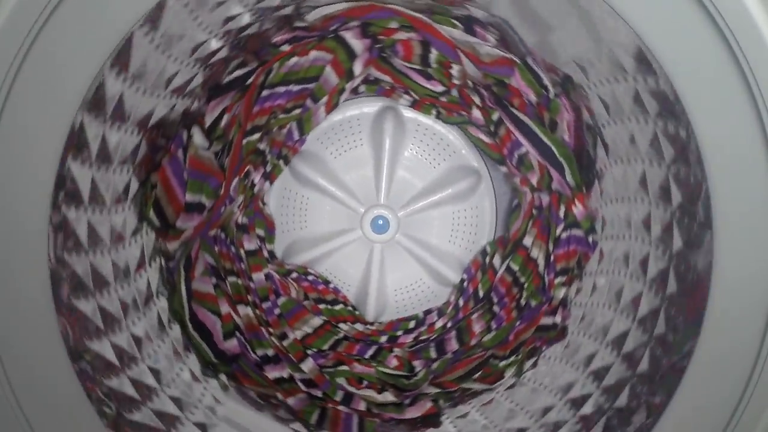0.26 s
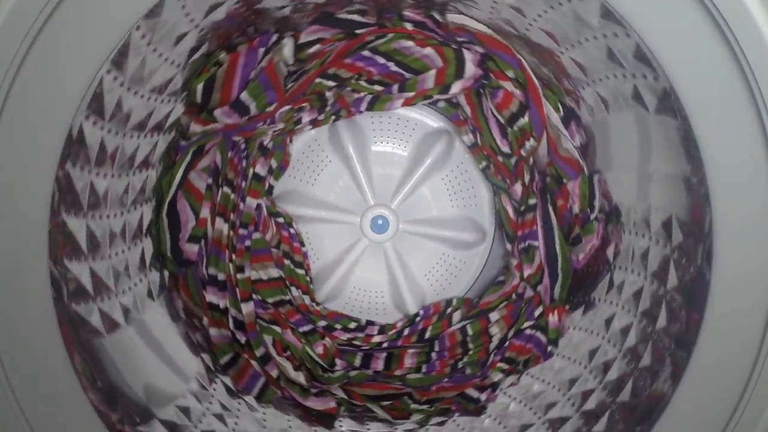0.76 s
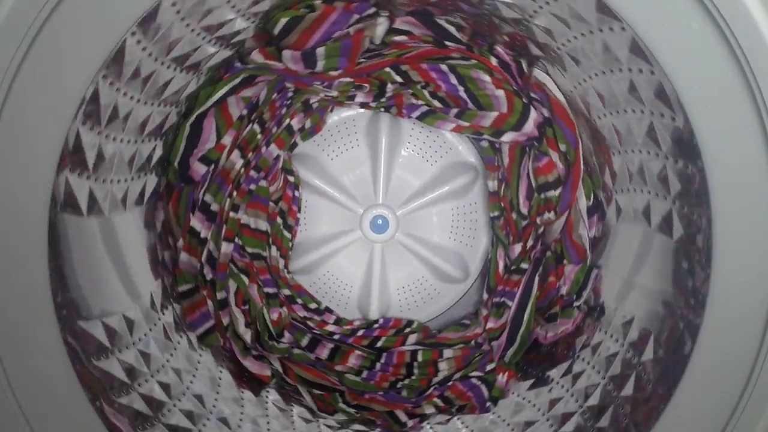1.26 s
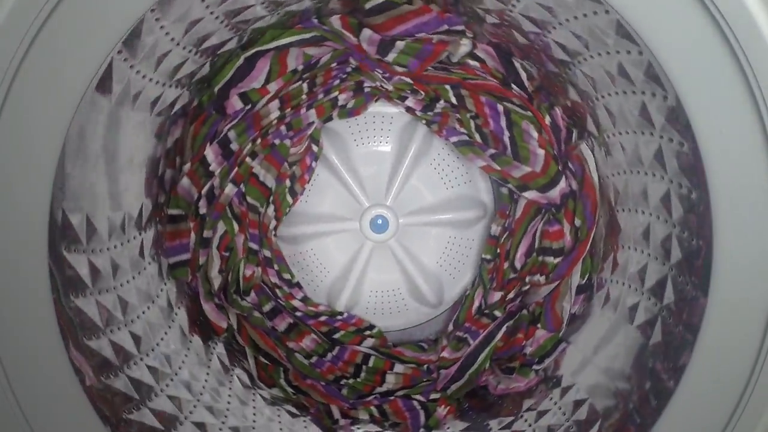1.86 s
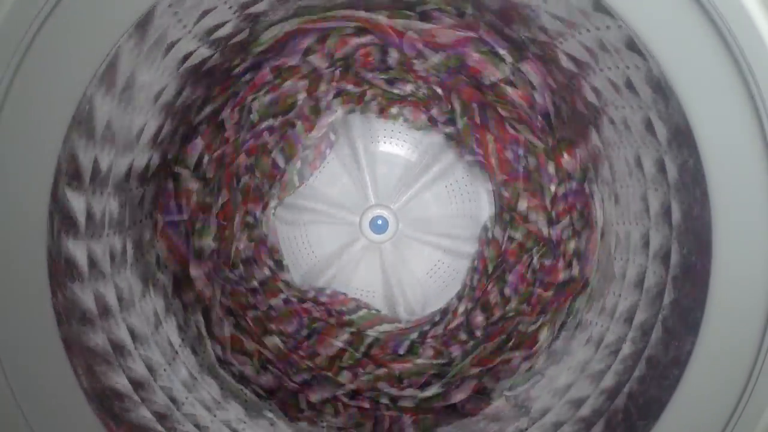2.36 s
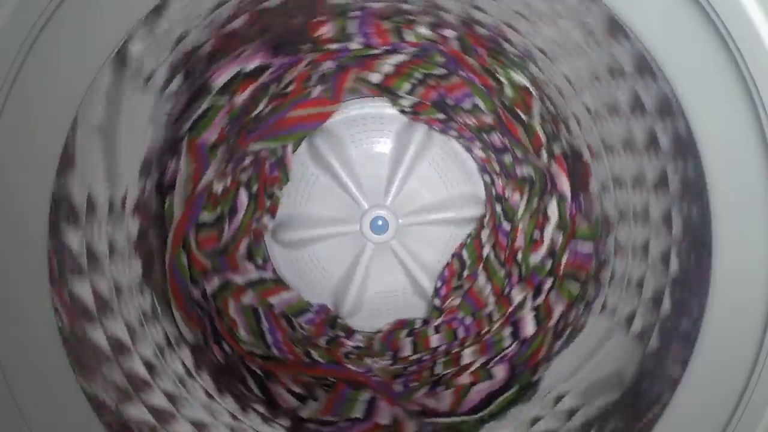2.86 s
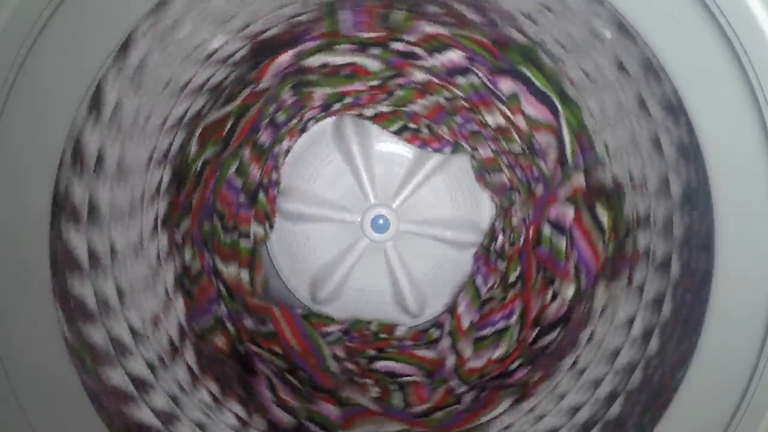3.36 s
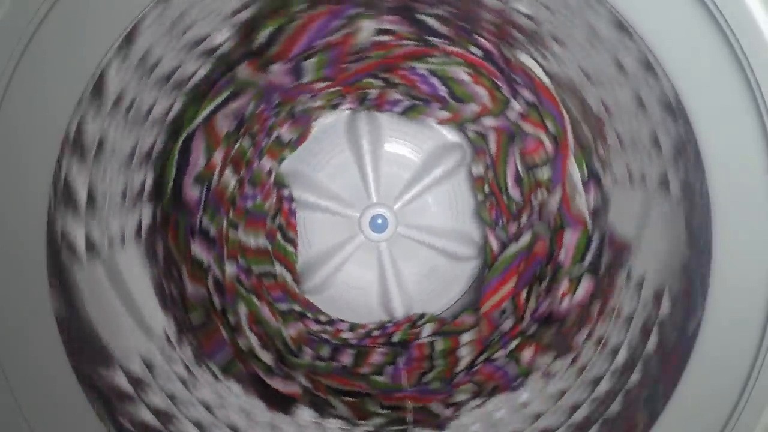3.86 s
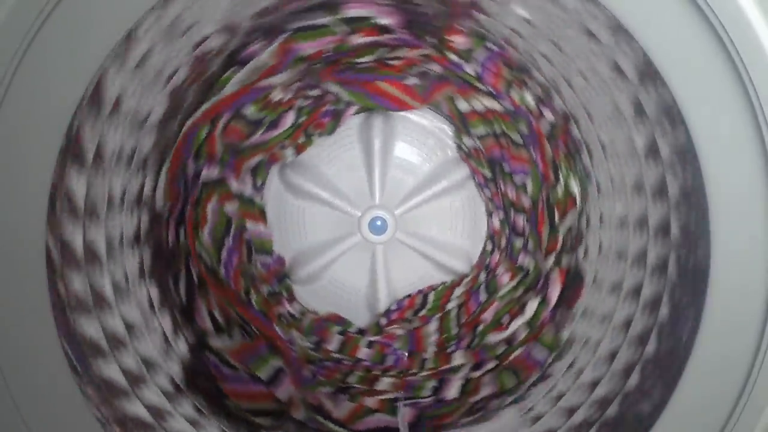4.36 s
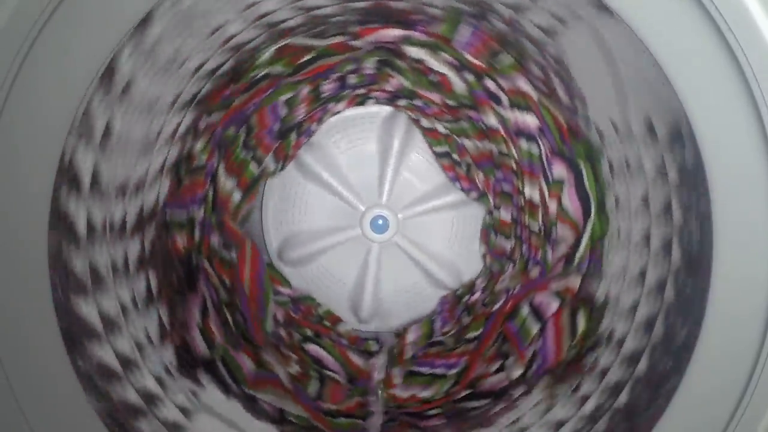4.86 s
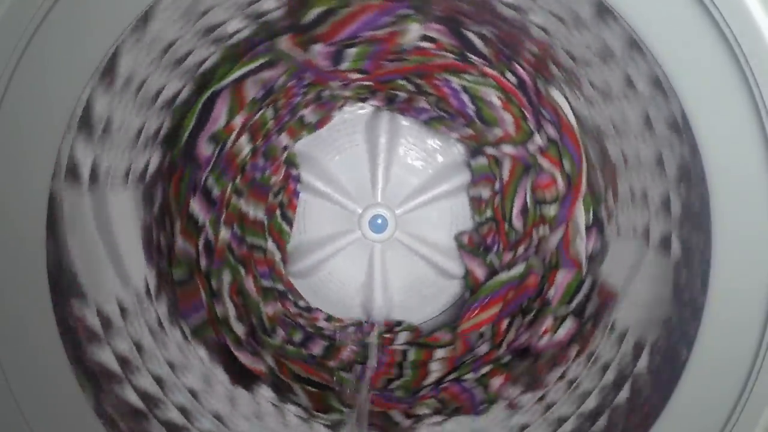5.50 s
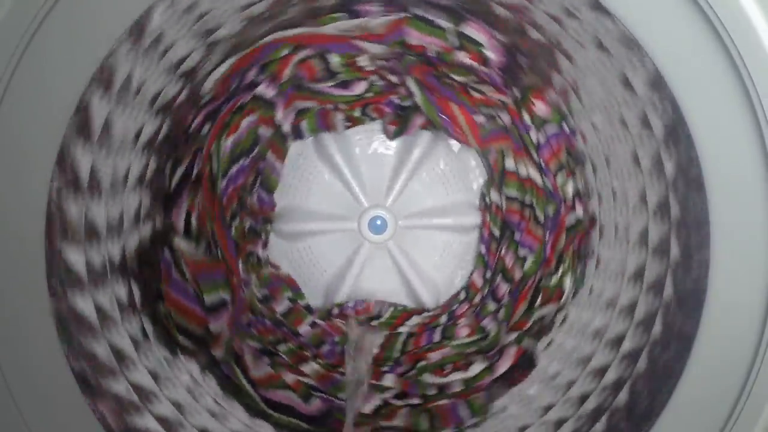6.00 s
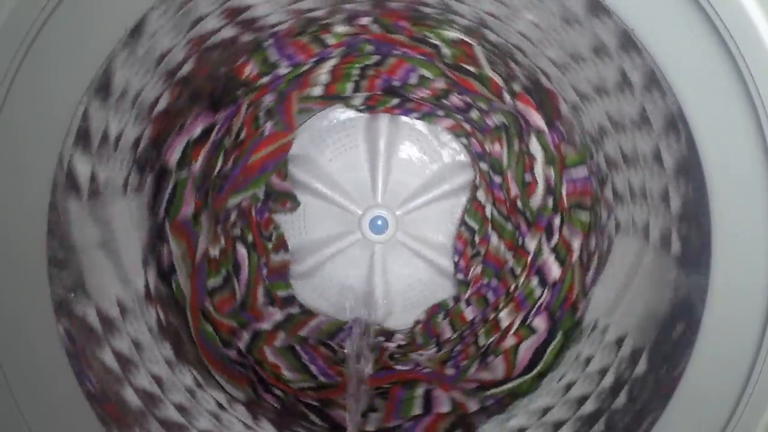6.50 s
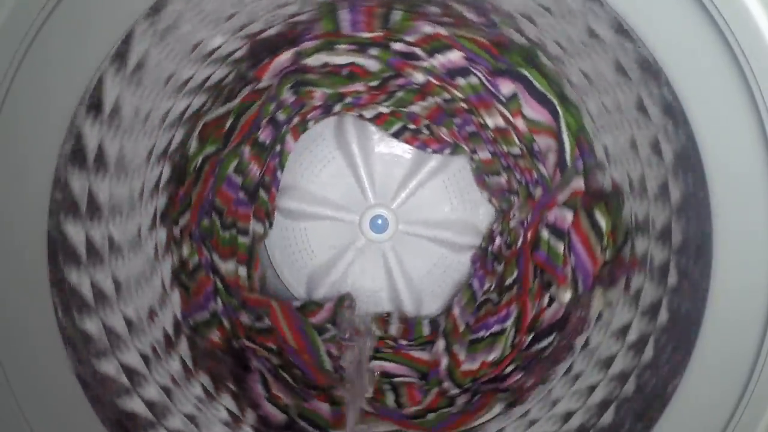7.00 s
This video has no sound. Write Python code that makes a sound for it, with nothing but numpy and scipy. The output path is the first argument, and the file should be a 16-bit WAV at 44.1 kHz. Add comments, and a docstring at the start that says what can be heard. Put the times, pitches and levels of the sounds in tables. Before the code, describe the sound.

Heard close above an open top-loading washer, the motor buzzes and grinds under load, with brief singing chirps early on. After about two and a half seconds the drive releases and the drum coasts with a low rumble, soft knocks and rubbing over a constant electrical hum. A few drips tick, then water spits and opens into a spattering jet on the laundry, pulsing as the drum turns.

```python
"""A top-loading washer, heard from just above its open tub: the motor pulls the drum up to speed, buzzing
and grinding, until the drive lets go and the drum coasts, rumbling and knocking, over a hum at twice the mains.
Tones make the hum, the buzz, the rotor's shake and the singing chirps; shaped noise makes most of the rest.
Water drips in and grows to a jet: bursts of noise spatter on the laundry, swell with each turn and ring the tub."""
import sys
import numpy as np
from scipy import signal
from scipy.fft import rfft, irfft, next_fast_len
from scipy.io import wavfile
from scipy.ndimage import map_coordinates

SR = 44100
rng = np.random.default_rng(int(sys.argv[2]) if len(sys.argv) > 2 else 0)


def digitize_waveform(pressure):
    """Quantize a signal to 16-bit integers and store it at the path in sys.argv[1].

    Rows of a 2-D input are taken as channels; values are limited to [-1, 1].
    """
    field = np.atleast_2d(pressure).T
    bounded = np.clip(field, -1, 1)
    quanta = np.round(bounded * 32767).astype(np.int16)
    wavfile.write(sys.argv[1], SR, quanta)


N = 319284

MAINS_HZ = 60
SPIT_S, OPEN_S = 5.16, 5.385  # the inlet first spits weakly, then opens fully
# the gears' whine climbs unevenly as the drum starts, then fades into their rasp: t/s, f/Hz, level/dB
GEAR_WHINE = [(0.0, 1270, -45), (0.1, 1267, -71), (0.35, 1215, -57), (0.58, 1252, -46), (0.82, 1281, -48),
              (1.13, 1305, -46.5), (1.25, 1295, -43.5), (1.55, 1303, -47), (1.82, 1290, -45.5),
              (2.25, 1320, -50), (2.5, 1314, -54)]
# standing waves of the tub: f/Hz, width/Hz, lift/dB
TUB_MODES = [(892, 26, 8), (1194, 80, 11), (1350, 76, -14.5), (1394, 69, -2.5), (1925, 81, 6),
             (2230, 160, 4.5), (2770, 70, 4.5), (3000, 140, -9), (3280, 180, 3), (3470, 87, -5),
             (4270, 290, -10), (4573, 51, 8), (6330, 370, 1.5), (7660, 260, -2), (8770, 490, -7.5),
             (10030, 590, -7.5)]


def amp(db):
    """Decibels to gain."""
    return 10 ** (np.asarray(db) / 20)


def unit(x):
    """Scale to rms 1."""
    return x / np.sqrt(np.mean(x ** 2) + 1e-20)


def since(s):
    """Seconds after the moment s for every sample, negative before it."""
    return np.arange(N) / SR - s


def curves(rows):
    """One value per sample for each column after the time."""
    s, *cols = np.transpose(rows)
    return [np.interp(np.arange(N) / SR, s, c) for c in cols]


def wobble(rate):
    """A smooth random curve, rate knots a second."""
    knots = rng.standard_normal(int(N * rate / SR) + 4)
    fine = np.arange(0, len(knots), 1 / 8)
    return np.interp(np.arange(N) * rate / SR, fine, map_coordinates(knots, [fine]))


def filtered(x, response):
    """x times a response of frequency."""
    m = next_fast_len(len(x) + 8192)  # room for the filter to ring out
    return irfft(rfft(x, m) * response(np.fft.rfftfreq(m, 1 / SR)), m)[:len(x)]


def coloured(x, points):
    """x through a spectrum of (f/Hz, level/dB) points, joined on a log frequency scale."""
    f, db = np.transpose(points)
    return filtered(x, lambda hz: amp(np.interp(np.log(hz + 1), np.log(f), db)))


def bandpass(f, centre, width):
    """Complex response of one resonance, 1 at its centre."""
    return 1j * f * width / (centre * centre - f * f + 1j * f * width)


def resonate(x, modes):
    """x through steep resonances (f/Hz, width/Hz, level/dB), each applied twice."""
    return filtered(x, lambda f: sum(amp(db) * bandpass(f, c, w) ** 2 for c, w, db in modes))


def with_rings(x, modes):
    """Standing waves lift or sink narrow bands (f/Hz, width/Hz, lift/dB); lifted ones ring on."""
    def response(f):
        gain = 1
        for c, w, db in modes:
            gain = gain * (1 + (amp(db) - 1) * bandpass(f, c, w))
        return gain
    return filtered(x, response)


def whine(hz, width):
    """A fuzzy tone of rms 1, about width Hz wide, that can glide."""
    angle = 2 * np.pi * np.cumsum(hz * np.ones(N)) / SR
    return unit(wobble(width) * np.cos(angle) + wobble(width) * np.sin(angle))


def mains_lines(lines, waver_db, drift):
    """Multiples of the mains frequency with spread phases, each wavering in level and phase (drift/rad)."""
    angle = 2 * np.pi * MAINS_HZ * np.arange(N) / SR
    total = 0
    for k, db in lines:
        level = amp(db + waver_db * wobble(14))
        total = total + level * np.sin(round(k) * angle + round(k) ** 2 + drift * wobble(9.0))
    return np.sqrt(2) * total


def taps(rows, t60, width_share):
    """Short bursts of noise, each gathered round its own pitch and dying by 60 dB in t60 seconds."""
    out, t = np.zeros(N + SR), np.arange(SR // 8) / SR
    for s, db, hz in rows:
        ring = unit(resonate(rng.standard_normal(len(t)), [(hz, hz * width_share, 0)]))
        attack = 1 - np.exp(-t / .001)
        out[round(s * SR):][:len(t)] += amp(db - 60 * t / t60) * attack * ring
    return out[:N]


def hum():
    """The windings hum at even multiples of the mains; the rotor shakes the tub once a turn."""
    # level of the hum before a small fixed lift: t/s, level/dB
    hum_levels = [(0.0, -29), (0.68, -25), (0.83, -28.5), (1.05, -26.0), (1.75, -28), (1.95, -26),
                  (2.11, -31), (2.3, -27), (2.6, -26.5), (3.1, -28.5), (3.57, -28.5), (3.75, -27.5),
                  (4.5, -26.5), (5.7, -28.5), (6.3, -28.5), (6.45, -26), (6.55, -28.5), (7.2, -28)]
    # the hum and its overtones: multiple of the mains, relative level/dB
    hum_lines = [(2, -1), (4, -31.5), (6, -24.5)]
    hum_db, = curves(hum_levels)
    windings = amp(hum_db + 1.0) * mains_lines(hum_lines, waver_db=0.53, drift=0.038)
    shaft_hz = 29.6 + 3 * wobble(8.3)
    shake = np.sqrt(2) * np.sin(2 * np.pi * np.cumsum(shaft_hz) / SR)
    return windings + amp(-46 + 2 * wobble(4.4)) * shake


def plops():
    """Once the jet runs fully, it traps bubbles in the folds of the laundry that plop at scattered pitches."""
    rate = 28  # bubbles a second
    times = np.arange(OPEN_S + 1 / rate, N / SR, 1 / rate)
    late, size, pitch = np.clip(rng.standard_normal((len(times), 3)).T, -2, 2)
    rows = zip(times + 0.36 * late / rate, -46.5 + 2.9 * size, 1880 * np.exp(0.286 * pitch))
    return taps(rows, t60=0.043, width_share=0.085)


def splats(rows, life_s, pocket_db):
    """Water slaps cloth: each burst has a dull body, fine mist and pitched air pocket, and echoes in the tub."""
    reference_hz, length_power = 6040, .45  # lower splats ring longer than those at this pitch
    pocket_octaves, colour_db, colour_hz = 0.12, 2.5, 649  # pocket width; depth and spacing of own peaks and dips
    out, t = np.zeros(N + SR), np.arange(SR // 12) / SR
    attack = (1 - np.exp(-t / 0.0011)) ** 2
    for s, db, hz, body_db, mist_db in rows:
        tail_spread = np.exp(0.18 * rng.standard_normal())
        t60 = life_s * (reference_hz / hz) ** length_power * tail_spread
        fragments, peaks = rng.standard_normal((2, 56))
        # each splat breaks into fragments
        grain_db = 2 * np.interp(t, np.linspace(0, t[-1], len(fragments)), fragments)
        shape = amp(-60 * t / t60 + grain_db) * attack
        spectrum = [(400, body_db - 8), (1200, body_db - 10), (2200, body_db - 0.5), (3900, -0.75),
                    (6500, -0.052), (9000, mist_db + 7.0), (11500, mist_db - 0.5), (15000, mist_db - 13)]
        slap = coloured(rng.standard_normal(len(t)), spectrum)

        def pocket_and_colour(f):
            octaves_off = np.log2((f + 1) / hz)
            pocket = pocket_db * np.exp(-.5 * (octaves_off / pocket_octaves) ** 2)
            colour = colour_db * np.interp(f / colour_hz, np.arange(len(peaks)), peaks)
            return amp(pocket + colour)

        burst = shape * filtered(slap, pocket_and_colour)
        # the level is set by the first 7 ms
        out[round(s * SR):][:len(t)] += amp(db - 1) * burst / np.std(burst[t < .007])
    echo = rng.standard_normal(len(t)) * amp(-60 * t / 0.067) * (1 - np.exp(-t / 0.0028))
    echoed = signal.fftconvolve(out, echo / np.linalg.norm(echo))[:N]
    return with_rings(out[:N] + amp(-9.5) * echoed, TUB_MODES)


def slaps():
    """Drips, then slugs of water slap the cloth and burst over trapped pockets of air."""
    # single drips and slugs: t/s, relative level/dB, pitch f/Hz, body level/dB, mist level/dB
    slugs = [(4.4318, -52.5, 9330, 10.5, -8), (4.6294, -55.5, 7050, 4, -12), (5.0427, -50.5, 6170, -5, -19),
             (5.0853, -49.5, 6360, -13, -15), (5.1622, -49, 6680, 0, -10), (5.177, -50.5, 5610, 0, -16),
             (5.1884, -49.5, 2270, 5, -6), (5.2155, -51.5, 10900, 7, -1), (5.2455, -59.5, 6800, 0, -8),
             (5.3712, -57.5, 2110, 8, -4), (5.384, -59, 4580, 4, -9), (5.3905, -49.5, 8150, -3, -10.5),
             (5.3978, -43, 4600, 2, -9.5), (5.4112, -48, 6990, -9, -12), (5.4465, -42.5, 6540, 4, -18),
             (5.4505, -51, 7120, -2, -16), (5.4755, -39, 6400, -3, -17), (5.5092, -38, 4400, 6, -24.5),
             (5.514, -43, 2390, 6.5, -14.5), (5.525, -42.5, 6540, -8, -13.5), (5.5355, -47, 4590, 3, -8),
             (5.5603, -46, 3340, -2, -13.5), (5.5713, -42, 4640, 3, -20.5), (5.5892, -32.5, 2510, 7, -24.5),
             (5.7175, -52, 3500, -5, -9.5), (5.7246, -41.5, 3380, -6, -21), (5.7653, -46, 5490, -1, -15),
             (5.7725, -32, 5450, -13, -16), (5.7833, -43, 6400, -8, -9), (5.7945, -45.5, 10000, -11, -2),
             (5.8137, -51, 5600, -4, -9.5), (5.8297, -43, 5340, -2, -11), (5.841, -46, 4600, -5, -17),
             (5.8525, -39.5, 4640, -2.5, -14.5), (5.9135, -46, 6350, 5, -18.5),
             (5.9704, -46, 6380, -12, -17), (6.0048, -43.5, 6410, -18, -6), (6.0213, -46, 2110, 5, -9),
             (6.0277, -43.5, 2250, -5.5, -11.5), (6.0472, -50, 6660, -5.5, -16),
             (6.0745, -41.5, 7080, 1, -17), (6.085, -37.5, 4590, 8.5, -12.5),
             (6.0995, -40, 4620, -11, -3.5), (6.1115, -46, 6200, 0, -11.5), (6.133, -36.5, 6170, -1, -20),
             (6.143, -44, 7000, -5, -13.5), (6.1585, -37, 5400, -4, -15), (6.1799, -43.5, 4770, 7, -18.5),
             (6.203, -51, 1850, 5, -22), (6.2138, -43.5, 7060, 0, -9.5), (6.2434, -44.5, 2260, -5, -18.5),
             (6.284, -51.5, 1650, 17, -19), (6.3038, -44, 6260, 1, -5), (6.344, -44.5, 6420, -1, -7),
             (6.3515, -39, 7200, 5, -10), (6.3774, -39, 6340, -6, -8), (6.3955, -44, 2110, 6, -7),
             (6.407, -42, 5600, -2, -14), (6.417, -40, 6300, -4.5, -17.5), (6.4438, -40.5, 6450, 7, -14),
             (6.4612, -36, 5700, -4, -18), (6.472, -38.5, 6100, -8, -22), (6.4955, -45, 3280, 0, -14.5),
             (6.539, -38.5, 3840, 7, -15.5), (6.557, -32, 6300, 5, -16), (6.6089, -47.5, 5730, -4, -14),
             (6.6295, -41.5, 6500, -23, -22), (6.6445, -47.5, 6310, -12, -8.5), (6.66, -49, 6590, -7, -7.5),
             (6.686, -40.5, 6400, -5, -7), (6.7281, -43.5, 6170, -12, -13), (6.736, -48, 4400, -4.5, -4),
             (6.7535, -43.5, 3930, 0, -14), (6.7715, -48.5, 7500, -6, -8), (6.785, -44.5, 6520, -9, -6.5),
             (6.8068, -39, 6400, -14, -15), (6.8349, -42, 6130, -7, -17), (6.8499, -36.5, 5800, -4.5, -8),
             (6.8625, -43.5, 7200, -2, -9.5), (6.8728, -41, 5980, -7, -10.5), (7.0125, -46.5, 5780, 6, -14),
             (7.0344, -58, 6410, 1, -2), (7.0487, -36.5, 7250, 2.5, -20.5), (7.1405, -40, 6400, -16, -2),
             (7.1596, -42, 6330, -10, -8), (7.1826, -41, 5530, 0, -8.5), (7.2035, -42, 6360, 0, -14.5),
             (7.2195, -40, 4900, -7, -15)]
    return splats(slugs, life_s=0.02, pocket_db=9)


def jet():
    """The jet breaks into drops over a faint fizz, swelling once per drum turn; its weight drums on the tub wall."""
    # spectrum of the fizz: f/Hz, relative level/dB
    spray_colour = [(300, -7), (600, 15.5), (1000, -1), (2000, 8), (3000, -9), (4200, -3), (5500, -1),
                    (7000, -0.5), (8500, -11), (11500, -6), (15000, -23)]
    turn_hz, crest_s = 2.92, 6.2  # drum turns a second; a moment when the laundry meets the jet most fully
    drop_rate = 125  # small drops a second between the slugs

    def opened(s):
        return np.clip(since(s) / 0.039 + .5, 0, 1)

    turn = amp(1.5 * np.cos(2 * np.pi * turn_hz * since(crest_s)))
    flow = np.maximum(amp(-7) * opened(SPIT_S), opened(OPEN_S))

    times = np.arange(SPIT_S, N / SR, 1 / drop_rate)
    late, size, pitch, body, mist = rng.standard_normal((len(times), 5)).T
    drop_s = times + .4 * late / drop_rate
    drop_db = -52.5 + 3 * np.minimum(size, 1.5)
    drop_rows = zip(drop_s, drop_db, 6200 * np.exp(.4 * pitch), -2 + 5 * body, -10 + 4 * mist)
    drops = splats(drop_rows, life_s=0.02, pocket_db=11)

    fizz = rng.standard_normal(N) * amp(5.5 * wobble(260))
    # the fizz grows by 2.5 dB a second while the stream breaks up unevenly
    spray_db = -59.5 + 2.5 * since(OPEN_S) + 0.5 * wobble(25)
    spray = amp(spray_db) * unit(with_rings(coloured(fizz, spray_colour), TUB_MODES))

    wall_modes = [(435, 164, -3.0), (852, 41, -1.5), (1088, 89, -4.0), (1197, 100, 1.0)]
    wall = unit(resonate(rng.standard_normal(N) * amp(1.9 * wobble(22)), wall_modes))
    wall_db = -52.5 - 2 * since(OPEN_S)  # less as the laundry soaks
    return turn * (flow * (drops + spray) + opened(OPEN_S) * amp(wall_db) * wall)


def knocks():
    """The load knocks and brushes softly against the drum in short pitched bursts."""
    # single knocks: t/s, relative level/dB, pitch f/Hz
    knock_rows = [(2.5986, -41, 1545), (2.6785, -36.5, 1290), (2.7, -51, 4750), (2.7953, -52, 1260),
                  (2.8848, -39, 1530), (2.9284, -41, 1290), (3.0734, -39, 1300), (3.088, -44, 2300),
                  (3.1704, -46, 1660), (3.2921, -48, 1280), (3.5964, -48, 3220), (3.8189, -45.5, 1390),
                  (3.8547, -42, 1260), (3.9661, -45, 2250), (4.0599, -45, 1230), (4.4215, -36.5, 1950),
                  (4.5827, -43, 1620), (4.8239, -48, 2200), (4.8646, -52, 2140), (5.213, -36.5, 1220),
                  (5.369, -39, 1200)]
    return amp(-3.5) * taps(knock_rows, t60=0.078, width_share=0.2)


def drum():
    """The loaded drum rumbles and booms, and rubs with an uneven grain that rings the gear case in patches."""
    # the load shifts and the tub booms: t/s, level/dB
    boom_rows = [(2.66, -39), (2.81, -42), (3.0, -42), (3.46, -43), (3.89, -38), (5.27, -36.5),
                 (5.46, -34.5), (5.65, -35.5), (5.82, -30.5)]
    # spectra of the rumble and of the rubbing: f/Hz, relative level/dB
    rumble_colour = [(15, -8.5), (29, -2.5), (42, -5), (60, -11), (88, 3.5), (115, -2), (145, 6), (180, -5),
                     (240, -10.5), (320, -19), (450, -24.5), (900, -56.5), (3000, -100)]
    rub_colour = [(150, -8.5), (400, 2), (550, -0.5), (750, 0), (930, -6.5), (1250, -5), (1600, -9.5),
                  (1780, -12), (2350, -12), (3000, -15), (4700, -19.5), (7000, -24.5), (10000, -31.5),
                  (15000, -39.5)]
    # resonances of the drum's shell: f/Hz, width/Hz, lift/dB
    shell_modes = [(1212, 85, 5.5), (1530, 240, 4), (1920, 160, 6.5), (2200, 320, 1.5), (2770, 140, 3.5),
                   (3220, 130, 5.5), (3700, 180, 4), (4650, 270, 5), (6500, 250, 4), (7000, 220, 2)]

    wet = np.clip(since(SPIT_S) / 0.52, 0, 1)  # it rumbles more once water runs in
    rolling = amp(-38.5 + 3.5 * wet + 0.5 * wobble(9.7))
    booms = sum(amp(db) * np.exp(-.5 * (since(s) / 0.057) ** 2) for s, db in boom_rows)
    rumble = np.hypot(rolling, booms) * unit(coloured(rng.standard_normal(N), rumble_colour))

    after_peak = since(3.86)
    rub_db = -50.5 + np.minimum(0.77 * after_peak, -2.04 * after_peak)  # dB a second up, then down
    grain = rng.standard_normal(N) * amp(1.16 * wobble(24) + 1.45 * wobble(220))
    rub = unit(with_rings(coloured(grain, rub_colour), shell_modes))
    case_modes = [(1255, 55, -1.5), (1591, 72, -8.5), (2280, 440, -12.5)]
    patches = sum(amp(2.2 * wobble(14)) * resonate(grain, [mode]) for mode in case_modes)
    return rumble + amp(rub_db) * (rub + amp(-9.5) * unit(patches))


def chirps():
    """As the drum is dragged up to speed, the drive sticks and slips; each catch makes the gear whine sing out."""
    # single catches: t/s, relative peak level/dB
    catches = [(0.663, -31), (0.723, -27), (0.7477, -28), (0.7811, -28.5), (0.813, -30.5), (0.832, -29),
               (0.873, -33.5), (0.9053, -23.5), (0.9727, -36), (0.9981, -32), (1.0214, -26),
               (1.0495, -27.5), (1.0884, -31), (1.1308, -26)]
    out, t = np.zeros(N + SR), np.arange(SR // 10) / SR
    swell = (1 - np.exp(-t / 0.002)) ** 2 * amp(-60 * t / 0.067)  # swells fast, then rings on
    for s, db in catches:
        out[round(s * SR):][:len(t)] += amp(db - 4) * swell / swell.max()
    whine_hz, _ = curves(GEAR_WHINE)
    return out[:N] * np.sin(2 * np.pi * np.cumsum(whine_hz + 16 * wobble(39.93)) / SR)


def motor():
    """Under load the motor buzzes, shakes the cabinet and grinds its gears in time with the torque ripple."""
    # the drive, before each layer's own offset: t/s, load level/dB, rasp level/dB
    drive = [(0.0, -36, -50.5), (0.42, -37.5, -51.5), (0.6, -36, -45.5), (0.78, -35, -46),
             (0.86, -34.5, -49), (0.95, -36, -44), (1.2, -35, -43), (1.5, -35, -45), (1.93, -34.5, -43.5),
             (2.25, -38, -50), (2.5, -46.5, -53.5)]
    # lines of the loaded motor, and lines that follow the rasp: multiple of the mains, relative level/dB
    motor_lines = [(1, -0.5), (3, -6.5), (4, -11), (5, -10.5), (6, -2), (7, -12.5), (8, -16.5)]
    gear_lines = [(8, -13.5), (9, -15.5), (10, -21.5), (11, -22.5), (14, -24), (16, -23.5), (22, -21)]
    # gear resonances, most swelling and two sinking, each round its own moment:
    # f/Hz, width/Hz, relative level/dB, moment t/s, swell (or, if negative, dip) level/dB
    gear_modes = [(551, 153, 1, 1.65, 3), (1131, 73, 4, 0.46, 1.5), (1232, 114, 5, 1.78, 5),
                  (1378, 164, 4, 2.15, 4), (1496, 130, -5, 1.6, 7.5), (1706, 110, -3.5, 1.3, 6),
                  (1825, 89, -4.5, 0.3, 12.5), (1923, 140, -1.5, 2.8, 4.5), (2137, 290, -3.5, 0.56, 5),
                  (2236, 120, -0.5, 2.1, 6.5), (2366, 64, -1.5, 0.54, 7.5), (2570, 66, -8, 0.7, 1),
                  (2778, 140, -10, 1.7, 1), (3115, 72, -10.5, 1.7, 1.5), (4230, 550, -19.5, 1.5, -3),
                  (5700, 1900, -28, 1.6, -0.5)]
    # spectrum of the shaken cabinet: f/Hz, relative level/dB
    cabinet_colour = [(40, -25), (62, -10.5), (85, -3.5), (110, -2.5), (145, 5), (180, -10), (280, 2.5),
                      (335, -1), (375, -14), (420, 4), (480, -15), (560, -16), (750, -26), (1000, -21),
                      (1600, -54.5), (4000, -91.5)]
    # the shaft beats against the hum: f/Hz, width/Hz, level over the load/dB
    throb_tones = [(89.7, 9, -10.5), (145.1, 12, -4.5)]

    load_db, rasp_db = curves(drive)
    whine_hz, whine_db = curves(GEAR_WHINE)
    t = np.arange(N) / SR
    ripple = np.sin(2 * np.pi * 2 * MAINS_HZ * t)
    shaft = np.sin(2 * np.pi * 27 * t + 1.0 * wobble(3.6))  # the gears are loaded unevenly as the shaft turns
    pressure = amp(2.0 * ripple + 0.56 * shaft + 1.4 * wobble(80))

    whirr = amp(whine_db) * unit(whine(whine_hz, 36) * amp(2.4 * shaft + 0.8 * wobble(120)))

    rasp = 0
    for hz, width, db, moment_s, change_db in gear_modes:
        change = amp(change_db * np.exp(-.5 * (since(moment_s) / 0.3) ** 2) + 1.8 * wobble(5.84))
        teeth = rng.standard_normal(N) * pressure
        rasp = rasp + change * resonate(teeth, [(hz, width, db)])
    rasp = amp(rasp_db + 3.5 + 0.52 * wobble(18)) * unit(rasp)

    shake = amp(load_db - 1.5) * unit(coloured(rng.standard_normal(N) * amp(2.0 * shaft), cabinet_colour))
    throb = sum(amp(load_db + db) * whine(hz, width) for hz, width, db in throb_tones)
    # the cabinet booms while the drum is slow: dB a second up, then down
    groan_db = -37.5 + np.minimum(26 * since(0.29), -22.5 * since(0.29))
    groan = amp(groan_db) * whine(215, 30)
    buzz = amp(load_db - 4.0) * mains_lines(motor_lines, waver_db=1.5, drift=0.13)
    gear_buzz = amp(rasp_db + 6.5) * mains_lines(gear_lines, waver_db=2.5, drift=0.24)

    # buzz and throb sink first as the motor is unloaded, then the drive lets go: dB a second
    unload = amp(-40 * np.maximum(since(2.29), 0))
    release = amp(-190 * np.maximum(since(2.52), 0))
    return release * (whirr + rasp + shake + groan + gear_buzz + unload * (throb + buzz))


def scene():
    """Machine and water together at one microphone, in one channel."""
    water = plops() + slaps() + jet()
    machine = hum() + knocks() + drum() + chirps() + motor()
    return (water + machine)[None]


def record(dry):
    """The microphone channel keeps nothing from its band limit of 15200 Hz upward."""
    return np.array([filtered(x, lambda hz: hz < 15200) for x in dry])


dry = scene()
out = record(dry)
digitize_waveform(out)
```